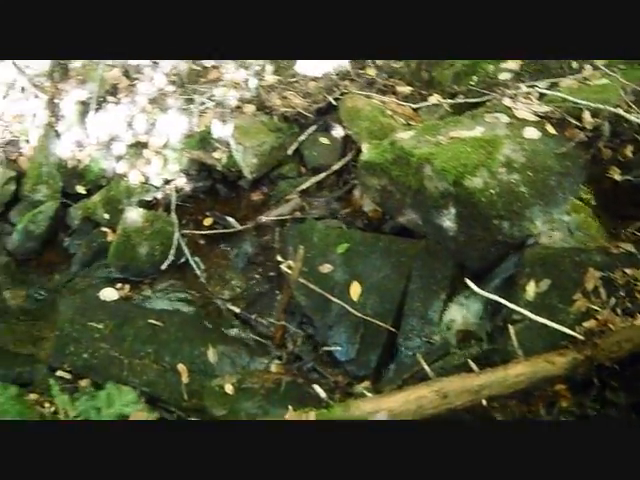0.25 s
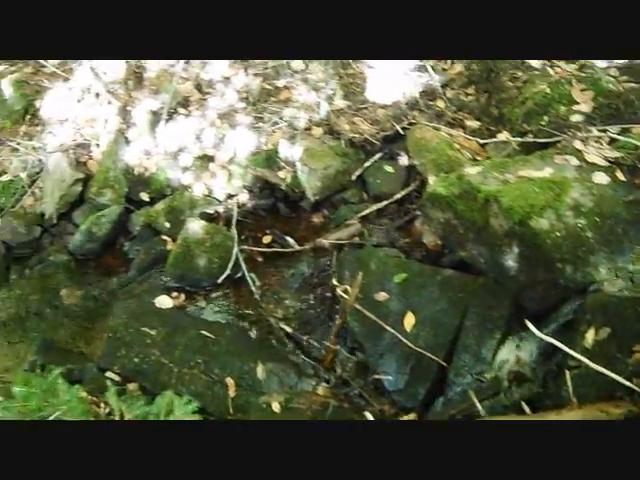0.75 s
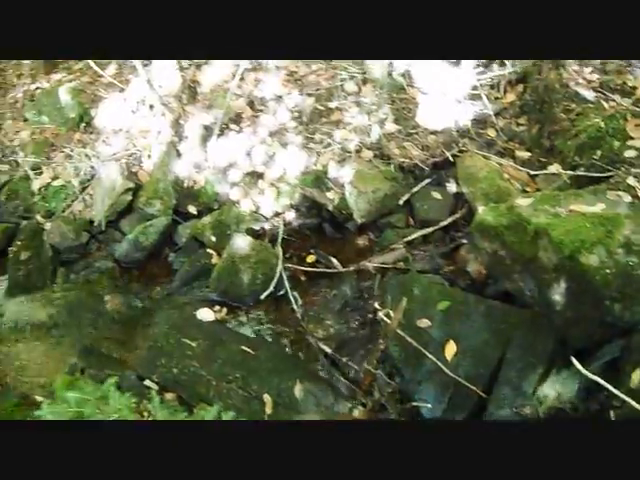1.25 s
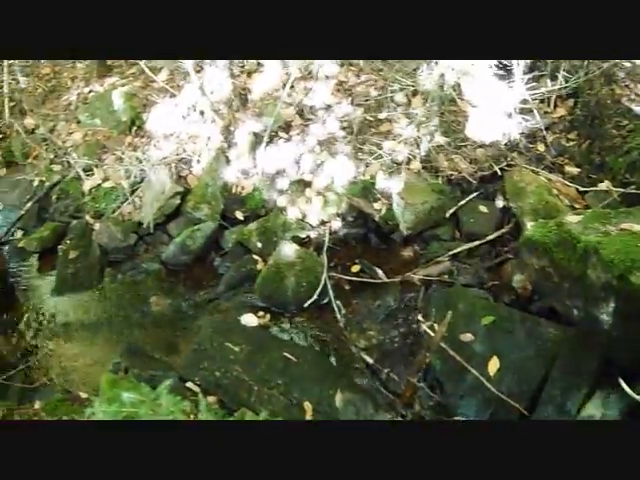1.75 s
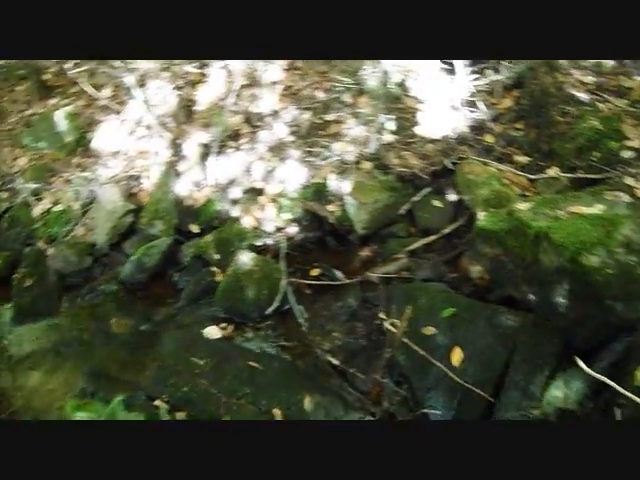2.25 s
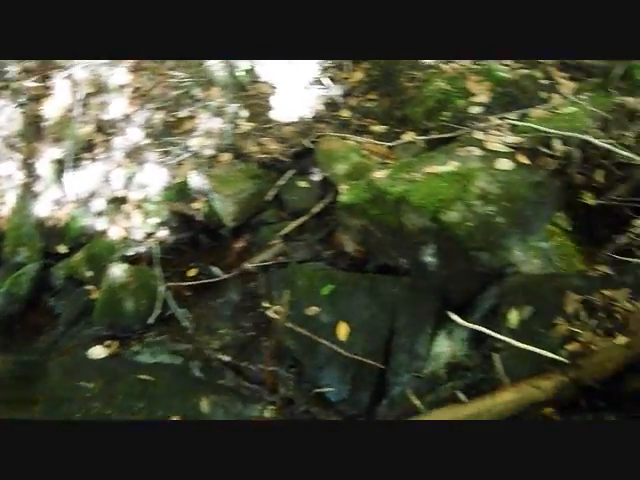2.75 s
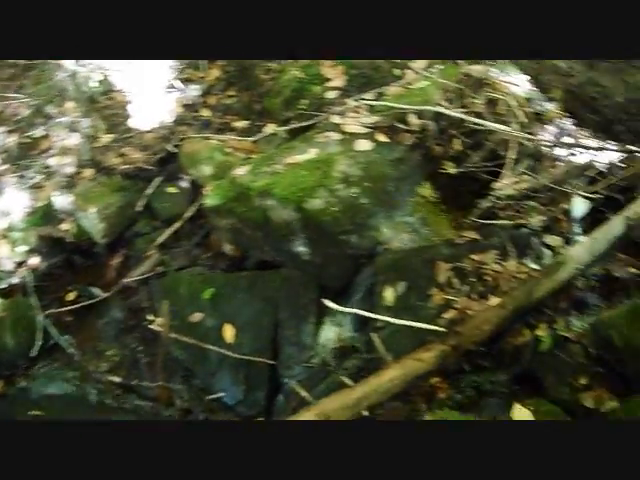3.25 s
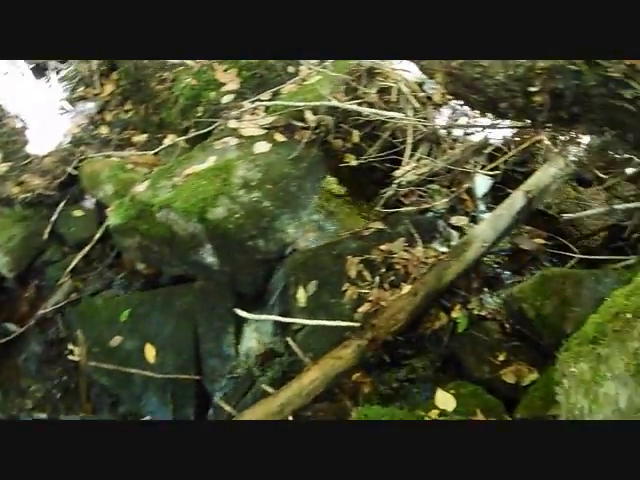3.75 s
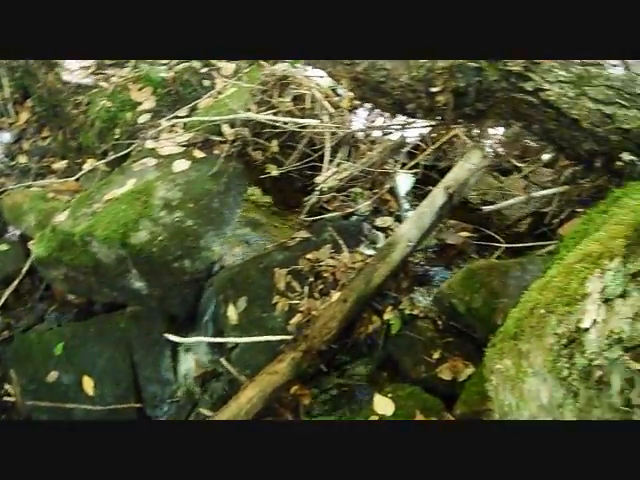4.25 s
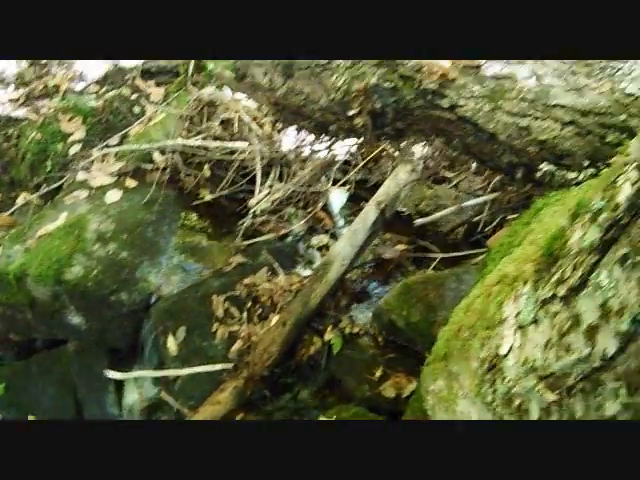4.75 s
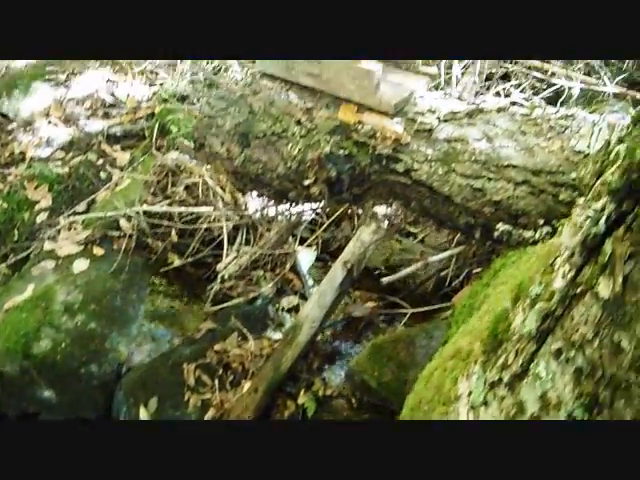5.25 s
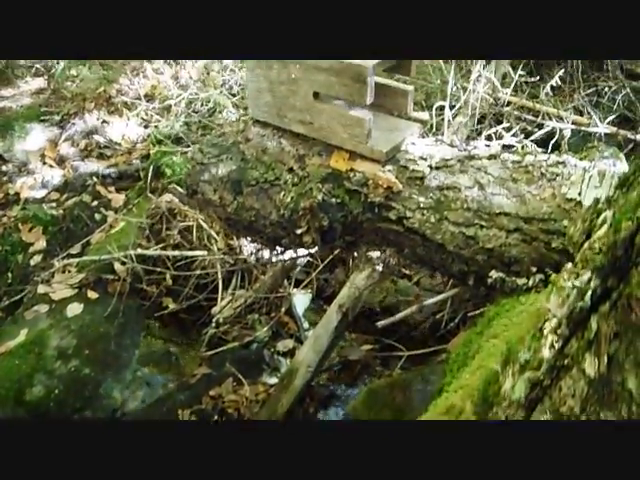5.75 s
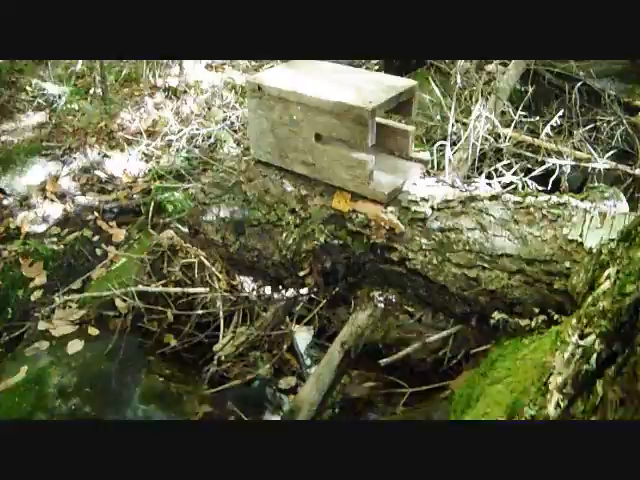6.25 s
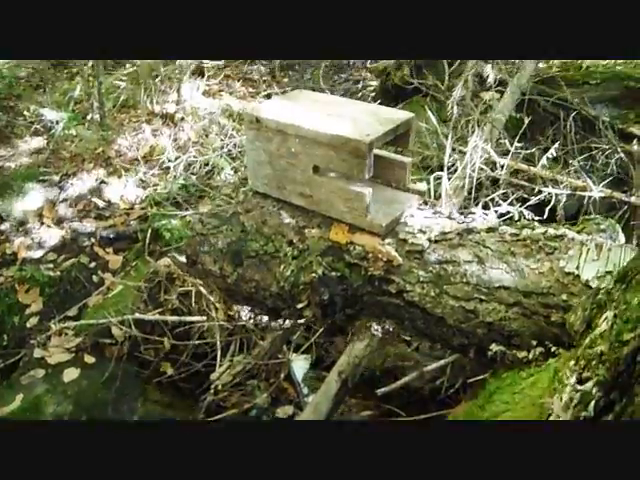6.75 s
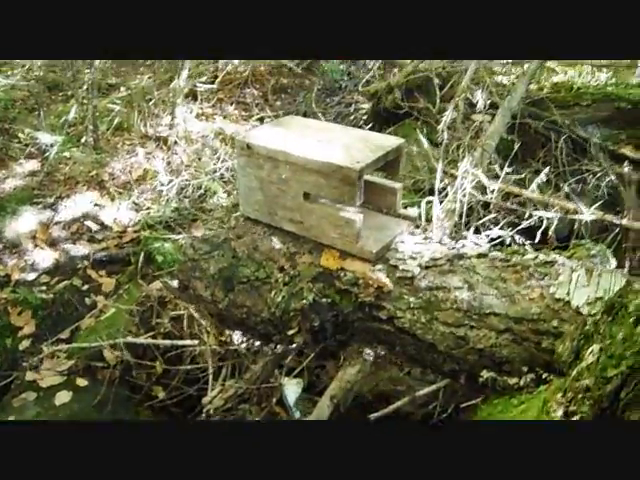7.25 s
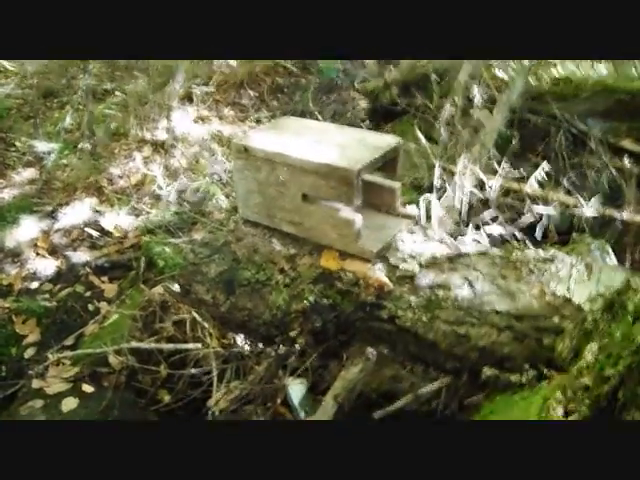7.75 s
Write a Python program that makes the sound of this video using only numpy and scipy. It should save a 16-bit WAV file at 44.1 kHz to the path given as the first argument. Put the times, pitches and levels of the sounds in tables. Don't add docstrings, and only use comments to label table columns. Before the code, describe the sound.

A small woodland brook runs steadily over mossy stones, heard close through a small handheld microphone. A bright, dense rush mixes with low gurgles, round plops, tiny chirping bubbles and occasional wet slaps on rock. The treble colour shifts slightly as the hand turns, and soft grip rumbles come and go. Near the end the plastic casing is knocked with a heavy thud, then a sharp crack.

```python
import sys
import numpy as np
from scipy import signal
from scipy.fft import rfft, irfft
from scipy.io import wavfile
from scipy.ndimage import uniform_filter1d

SR = 44100
rng = np.random.default_rng(int(sys.argv[2]) if len(sys.argv) > 2 else 0)


def volts(x):
    e = np.asarray(x, float) / 20
    return 10 ** e


def store_wav(level_fs):
    pcm = np.round(np.clip(np.atleast_2d(level_fs), -1, 1) * 32767)
    wavfile.write(sys.argv[1], SR, pcm.T.astype(np.int16))


N = 352837

# [t/s, level/dB]
FLOW = [(0, -25.5), (1.0, -25.5), (1.5, -25.5), (2.15, -26), (2.7, -25), (3.4, -25), (5.0, -25.5),
        (5.45, -25), (6.4, -25.5), (7.25, -25)]
# [f/Hz, level/dB per Hz]
GURGLE_COLOUR = [(59, -49), (100, -13), (156, -7.5), (226, 1), (360, -6), (462, -2.5), (1020, -4.5),
                 (1200, 0.5), (1400, -2), (1500, 0.5), (1950, -28), (3300, -120)]
# [f/Hz, level/dB per Hz]
FACING_COLOUR = [(880, -41.5), (1500, -13), (1830, 0.5), (2180, -4.5), (2570, 2), (2810, 5), (3230, -5),
                 (4170, -9.5), (4920, -17), (5710, -21), (6740, -16), (8540, -9.5), (10700, -22.5),
                 (12000, -18), (15700, -41.5)]
# [f/Hz, level/dB per Hz]
TURNED_COLOUR = [(880, -46.5), (1500, 0.5), (1900, -8.5), (2120, -0.5), (2790, 0.5), (3600, -19),
                 (4170, -8), (4640, -21), (5070, -11.5), (5490, -11), (6480, -21.5), (9150, -15),
                 (10800, -18.5), (13000, -29), (15700, -33.5)]
# [t/s, share turned away/0-1]
TURN = [
    (0, 0.28),
    (1.2, 0.15),
    (2.5, 0.14),
    (3.2, 0.37),
    (4, 0.4),
    (4.8, 0.64),
    (5.5, 0.68),
    (7.2, 0.75),
]
# [f/Hz, rms level/dB]
WHINE = [(7837.5, -59), (7897.4, -58.5), (15734.4, -77)]
# [f/Hz, level/dB per Hz]
RUMBLE_COLOUR = [(8.8, -39), (15, 5.5), (59, -6.5), (120, -3), (160, -56), (260, -120)]
# [t/s, peak level/dB]
GRIPS = [(0.78, -54), (1.05, -50), (3.08, -47), (4.97, -44), (5.46, -45), (5.56, -38), (5.93, -44),
         (6.1, -40), (6.91, -48), (7.345, -44), (7.75, -48)]
# [t/s, peak level/dB, f/Hz]
BIG_BUBBLES = [(0.1, -19, 860), (0.274, -20, 464), (0.532, -18, 755), (0.627, -20, 883), (1.011, -18, 875),
               (2.096, -18.5, 430), (3.57, -17, 980), (3.926, -17, 836), (4.037, -19, 560),
               (4.356, -15, 734), (5.065, -17, 464), (5.344, -21, 612), (5.564, -24, 630),
               (5.693, -21, 560), (5.892, -19, 584), (6.297, -19, 546), (6.32, -15, 960), (7.038, -21, 526),
               (7.563, -19.5, 520)]
# [t/s, peak level/dB, f/Hz]
ROUND_BUBBLES = [(0.1351, -18, 1150), (0.411, -14.5, 1230), (0.4974, -16, 1230), (0.7446, -17, 1220),
                 (1.4164, -15, 1220), (1.7938, -12, 1300), (2.518, -14, 1190), (2.714, -17, 1280),
                 (2.7937, -13.5, 1210), (2.9811, -12, 1270), (3.606, -14, 1180), (3.701, -15, 1230),
                 (3.8691, -16, 1220), (3.8944, -13.5, 1230), (4.355, -15, 1200), (4.383, -16, 1190),
                 (5.2212, -15, 1260), (5.256, -18, 1170), (6.321, -11, 1075), (7.771, -21, 1210),
                 (7.876, -13, 1260), (7.905, -10, 1276)]
# [t/s, peak level/dB, f/Hz]
SMALL_BUBBLES = [(0.2184, -10, 2220), (0.3017, -11, 1800), (0.633, -14, 1680), (1.0156, -12, 1740),
                 (1.6432, -11, 2060), (4.375, -13, 2080), (5.023, -9.5, 2120), (5.0689, -14, 2190),
                 (5.0928, -12, 1980), (3.055, -13, 1810), (5.5677, -10, 2230), (6.128, -12, 2170),
                 (6.1584, -9, 2160), (6.5041, -14, 2130), (6.8543, -11, 2250), (6.997, -12, 2240),
                 (7.1686, -7, 2280)]
# [t/s, peak level/dB, f/Hz]
TINY_BUBBLES = [(0.2026, -13, 2810), (0.413, -13, 2790), (0.6708, -5, 2570), (1.2246, -10.5, 2750),
                (1.4032, -5, 2540), (2.2049, -9, 2840), (2.4743, -10, 2590), (2.8639, -8, 2710),
                (3.02, -8.5, 2460), (3.443, -10, 2970), (3.4995, -7, 2650), (3.5406, -2.5, 2490),
                (3.615, -5.5, 2600), (2.881, -7, 2950), (7.346, -15, 2530), (3.3263, -16, 2660),
                (4.0528, -7, 3040), (4.0917, -8, 2800), (4.5002, -11, 2880), (5.9748, -7, 2670),
                (6.0302, -9, 2780), (6.1363, -6, 2560), (6.508, -9, 2840), (6.54, -5, 2860),
                (6.659, -5.5, 2630), (6.758, -12, 2530), (7.0342, -2, 2630), (7.1696, -3.5, 2550),
                (7.2644, -6, 2860), (7.3805, -7, 2850)]
# [t/s, peak level/dB, f/Hz]
DROPLETS = [(1.1962, -18, 4160), (1.715, -15, 4300), (2.929, -21, 4300), (3.2809, -17, 3430),
            (3.3583, -15, 3740), (3.4246, -16, 3420), (3.7544, -24, 4100), (3.8677, -14, 4180),
            (5.0744, -20, 3880), (5.5453, -21, 4070), (5.7618, -19, 4180), (6.32, -15, 3870),
            (6.7395, -19, 4100), (7.0032, -20, 5460), (7.037, -17, 4000), (7.101, -21, 5240),
            (7.1686, -17, 4130), (7.2634, -24, 5570), (7.879, -21, 5160)]
# [t/s, peak level/dB]
SPRAY = [(0.1715, -24), (0.5465, -15), (0.9093, -26), (1.031, -21), (1.1757, -31), (1.3356, -25),
         (1.564, -15), (1.6075, -23), (1.715, -24), (1.944, -25), (2.0872, -26), (2.2485, -20), (2.27, -20),
         (3.3397, -25), (4.1565, -28), (4.5989, -22), (4.696, -26), (5.033, -21), (5.3552, -23),
         (5.694, -26), (5.884, -23), (5.9893, -20), (6.4797, -27), (6.6272, -24), (6.7082, -21),
         (7.3544, -24)]
# [t/s, peak level/dB, f/Hz]
MIST = [(0.1012, -32, 11700), (0.2384, -29, 11700), (1.0301, -32, 11400), (1.5628, -21, 11000),
        (2.2488, -25, 11700), (2.5117, -25, 11700), (2.9302, -28, 11400), (3.3417, -25, 10900),
        (4.2532, -27, 11800), (4.377, -25, 11300), (4.695, -23, 10600), (5.694, -29, 11200),
        (7.2509, -27, 10600), (7.3552, -30, 10800)]
# [t/s, peak level/dB, f/Hz]
SLAPS = [
    (1.7152, -7.5, 3630),
    (2.0522, -10, 3680),
    (2.088, -8, 3720),
    (2.8762, -5.5, 3420),
    (3.7835, -5, 2770),
    (3.7922, -5, 3300),
    (3.8245, -14, 3000),
    (3.8677, -14, 3500),
]
# [t/s, thud level/dB, body level/dB, crack level/dB, gain duck/dB]
KNOCKS = [
    (7.311, -28, -16.5, -6, 1),
    (7.3561, -1, -3, -20, 6.5),
    (7.9481, -34, -16, 8.5, 9),
]
# [f/Hz, level/dB, time to fall 60 dB/s]
CASING_MODES = [(172, -15.5, 0.06), (302, -8.5, 0.031), (464, -8.5, 0.067), (676, -1.5, 0.049),
                (860, 1, 0.025), (1280, -16, 0.024), (1890, -10, 0.011), (3500, 1, 0.017)]
# [f/Hz, level/dB, time to fall 60 dB/s]
CRACK_MODES = [(1180, 0, 0.009), (1800, 4, 0.0063), (2770, 6, 0.0054), (4300, 4, 0.0045), (5800, 9, 0.0025),
               (9000, 3.5, 0.002), (11800, -1, 0.002)]


def rms_one(x):
    return x / np.sqrt(np.mean(x ** 2) + 1e-20)


def in_time(rows):
    s, value = np.transpose(rows)
    return np.interp(np.arange(N) / SR, s, value)


def drift(rate):
    r = np.exp(-40 * np.pi * rate / SR)
    coarse = rng.standard_normal(N // 20 + 4002)
    slow = signal.lfilter([1], [1, -2 * r, r * r], coarse)[4000:]
    return np.interp(np.arange(N) / 20, np.arange(len(slow)), rms_one(slow))


def impulse(spectrum):
    hz, db = np.transpose(spectrum)
    grid = np.maximum(np.arange(4097) * SR / 8192, 1)
    fine = np.linspace(0, np.log(SR / 2), 1000)
    rounded_db = uniform_filter1d(np.interp(fine, np.log(hz), db), size=9)
    cepstrum = irfft(np.log(volts(np.interp(np.log(grid), fine, rounded_db))))
    cepstrum[1:4096] *= 2
    cepstrum[4097:] = 0
    return rms_one(irfft(np.exp(rfft(cepstrum)))[:4096]) / 64


def colour(x, spectrum):
    return signal.oaconvolve(x, impulse(spectrum))[:N]


def ring(hits, hz, t60):
    r = volts(-60 / (t60 * SR))
    w = 2 * np.pi * hz / SR
    return signal.lfilter([0, np.sin(w)], [1, -2 * r * np.cos(w), r * r], hits + 1e-18)


def clicks(per_s, spread_db, surge):
    size_db = spread_db * np.minimum(rng.exponential(1, N), 4.5)
    sizes = volts(size_db) * rng.choice([-1, 1], N)
    return sizes * (rng.random(N) < per_s * surge / SR)


def water():
    surge = volts(2.2 * drift(8) + 2.2 * drift(30))
    swarm = 0
    for hz in np.geomspace(150, 15000, num=28):
        born = clicks(3.5 * np.sqrt(hz), 3.8, surge * volts(4.0 * drift(18)))
        swarm = swarm + rms_one(ring(born, hz, 15.2 / hz)) * np.sqrt(hz)
    ticks = rms_one(clicks(2500, 2.1, volts(6.5 * drift(25))))
    ticks = signal.sosfilt(signal.butter(1, 2500, "high", fs=SR, output="sos"), ticks)
    rush = rng.standard_normal(N) * surge ** 0.026
    return rms_one(rush + volts(-2.5) * rms_one(swarm) + volts(-3.5) * ticks)


def splash(flow):
    gain_db = 20 * np.log10(np.abs(rfft(impulse((np.array(FACING_COLOUR) + TURNED_COLOUR) / 2))))

    def at_source(rows):
        return [(s, db - gain_db[round(hz / SR * 4096)], hz) for s, db, hz in rows]

    spray = [(s, db, 8230) for s, db in SPRAY]
    flow = flow + bubbles(at_source(DROPLETS), cycles=15.0, swell=6.6, rise=0.041, boost_db=-5, burst_db=-4.5)
    flow = flow + bubbles(at_source(spray), cycles=24.0, swell=4.0, rise=0.096, boost_db=-3, burst_db=6.5)
    flow = flow + bubbles(at_source(TINY_BUBBLES), cycles=28.0, swell=1.3, rise=0.028, boost_db=-8, burst_db=-4)
    flow = flow + bubbles(at_source(MIST), cycles=27.0, swell=3.9, rise=0.063, boost_db=-2, burst_db=0)
    flow = flow + bubbles(at_source(SLAPS), cycles=6, swell=1.2, rise=0.1, boost_db=-2, burst_db=-5)
    turned = np.clip(in_time(TURN), 0, 1)
    return (1 - turned) * colour(flow, FACING_COLOUR) + turned * colour(flow, TURNED_COLOUR)


def whine():
    t = np.arange(N) / SR
    coil_db = -51.5 - 15 * in_time(TURN)
    tones = list(WHINE) + [(11719.3, coil_db)]
    return sum(volts(db) * np.sqrt(2) * np.sin(2 * np.pi * hz * t) for hz, db in tones)


def hand():
    t = np.arange(N) / SR
    half_length_s, tremor_db = 0.046, -50
    swells = sum(volts(db) * np.exp(-((t - s) / half_length_s) ** 2) for s, db in GRIPS)
    return (volts(tremor_db) + swells) * colour(rng.standard_normal(N), RUMBLE_COLOUR)


def bubbles(rows, cycles, swell, rise, boost_db, burst_db):
    out = np.zeros(N + 8192)
    puffs = rng.standard_normal((len(rows), 4096))
    chances = rng.random((len(rows), 2))
    for (s, peak_db, hz), chance, puff in zip(rows, chances, puffs):
        turns = np.arange(4096) / SR * hz
        decay = np.exp(-np.log(1000) * turns / (2 * cycles))
        shape = (1 - np.exp(-turns / swell)) ** 2 * decay
        bend = rise * chance[0] * np.minimum(turns, cycles) ** 2 / cycles
        phase = turns * (1 - rise / 2) + bend
        band = signal.butter(2, [0.78 * hz, min(1.73 * hz, .45 * SR)], "band", fs=SR)
        burst = volts(burst_db) * rms_one(signal.lfilter(*band, puff))
        tone = np.sin(2 * np.pi * (phase + chance[1])) + burst
        at = round((s + .0004) * SR)
        out[at:at + 4096] += volts(peak_db + boost_db) * shape / shape.max() * tone
    return out[:N]


def knocks():
    out = np.zeros(N)
    for s, thud_db, body_db, crack_db, _ in KNOCKS:
        hit = np.zeros(N)
        hit[round(s * SR)] = 1
        soft = signal.lfilter([.04], [1, -1.6, .64], hit)
        push = signal.lfilter([.0009], [1, -1.94, .9409], np.roll(hit, -90))
        out += volts(thud_db) * ring(push, 62, 0.012)
        for k, (hz, db, t60) in enumerate(CASING_MODES):
            out += (-1) ** k * volts(body_db + db) * ring(soft, hz, t60)
        for k, (hz, db, t60) in enumerate(CRACK_MODES):
            out -= (-1) ** k * volts(crack_db + db - 18.5) * ring(hit, hz, t60)
    return signal.sosfilt(signal.butter(6, 12000, fs=SR, output="sos"), out)


def ducking():
    t = np.arange(N) / SR
    attack_s, recovery_db_per_s = 0.01, 8
    loss_db = 0
    for s, *_, duck_db in KNOCKS:
        since = np.maximum(t - s - .002, 0)
        left_db = np.maximum(duck_db - recovery_db_per_s * since, 0)
        loss_db = loss_db + (1 - np.exp(-since / attack_s)) * left_db
    return volts(-loss_db)


def scene():
    flow = volts(in_time(FLOW)) * water()
    brook = volts(-5) * colour(flow, GURGLE_COLOUR) + splash(flow)
    low_bubbles = list(BIG_BUBBLES) + list(ROUND_BUBBLES) + list(SMALL_BUBBLES)
    singles = bubbles(low_bubbles, cycles=17.7, swell=1.26, rise=0.065, boost_db=-8.0, burst_db=-24)
    ducked = ducking() * (brook + whine() + knocks())
    return (ducked + singles + hand())[None]


def roll_off(x):
    return signal.sosfilt(signal.butter(12, 15830, fs=SR, output="sos"), x)


def record(dry):
    clipped = np.clip(dry, -.99, .99)
    converter = signal.cheby2(12, 60, 16630, fs=SR, output="sos")
    mix = signal.sosfilt(converter, clipped)
    return roll_off(mix)


dry = scene()
out = record(dry)
store_wav(out)
```